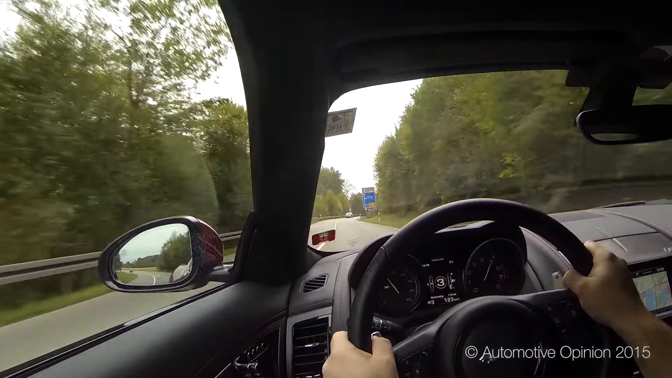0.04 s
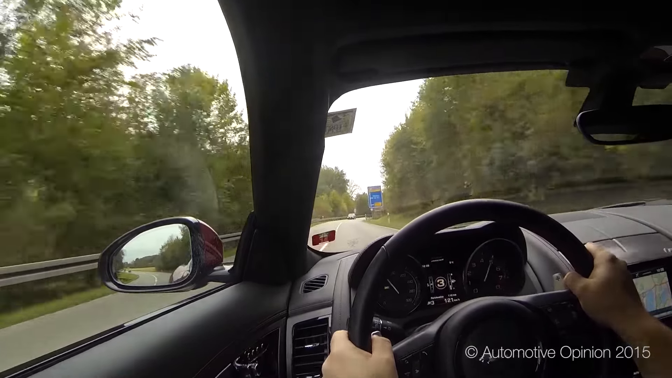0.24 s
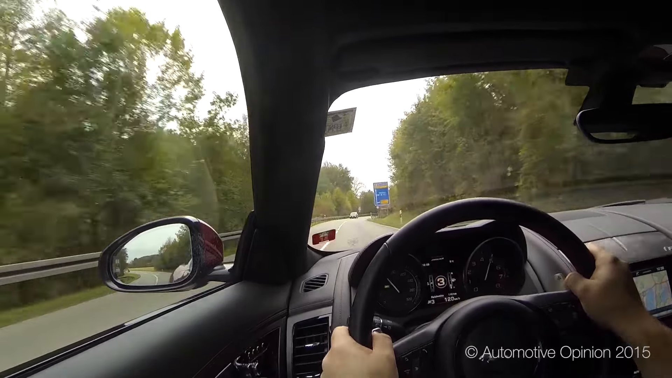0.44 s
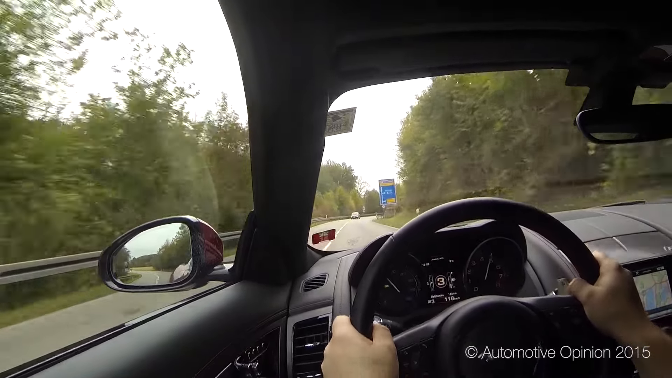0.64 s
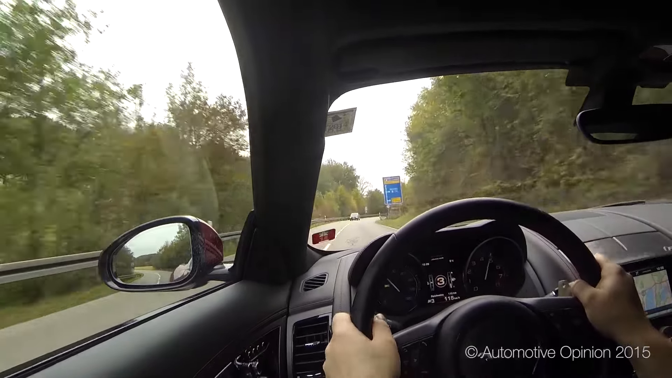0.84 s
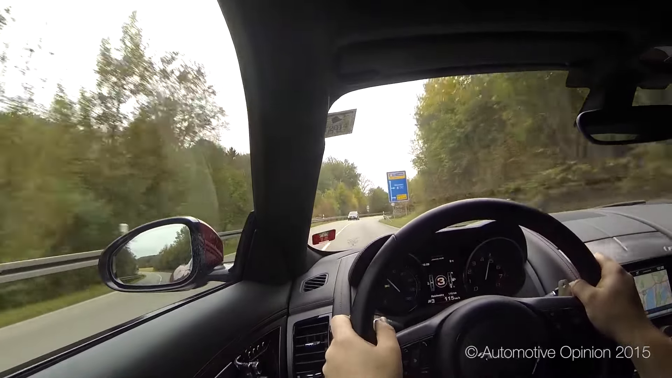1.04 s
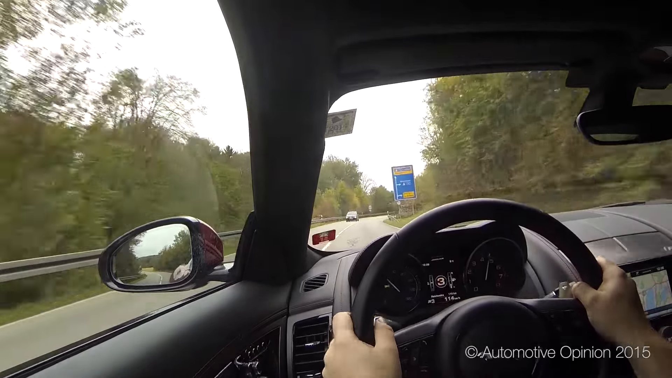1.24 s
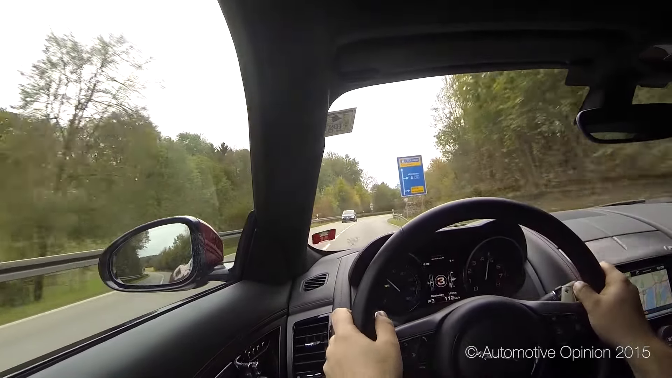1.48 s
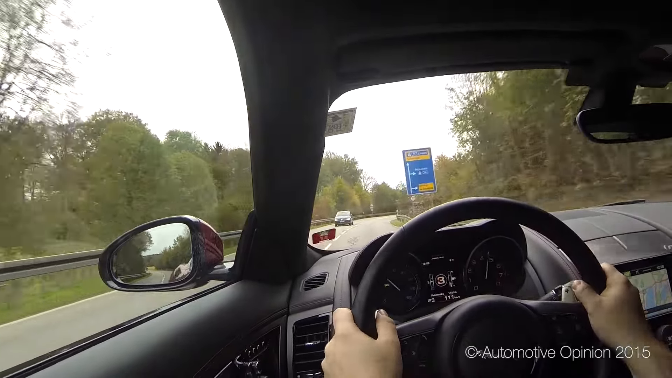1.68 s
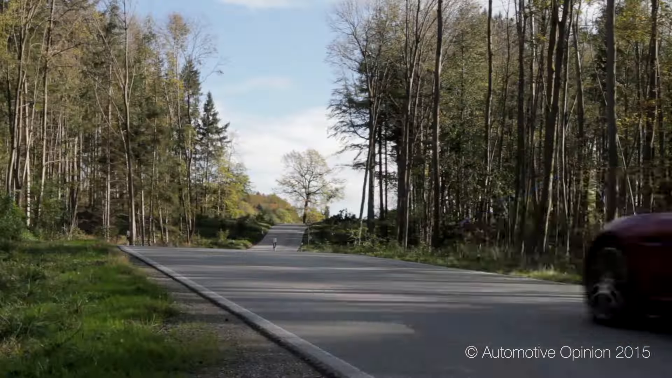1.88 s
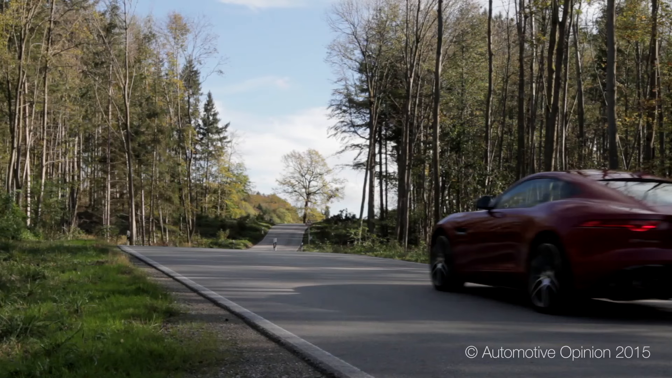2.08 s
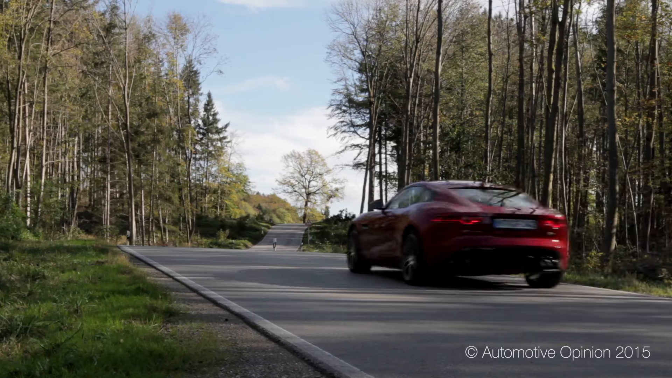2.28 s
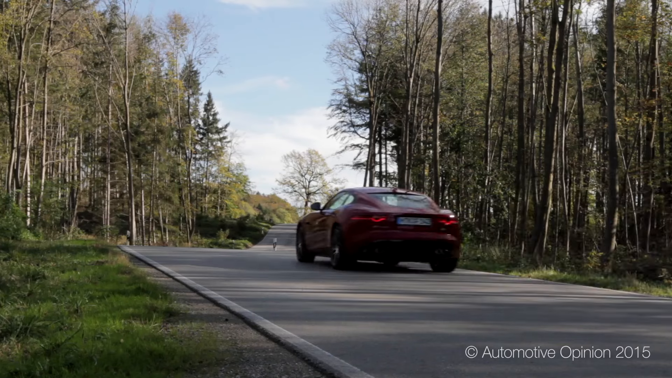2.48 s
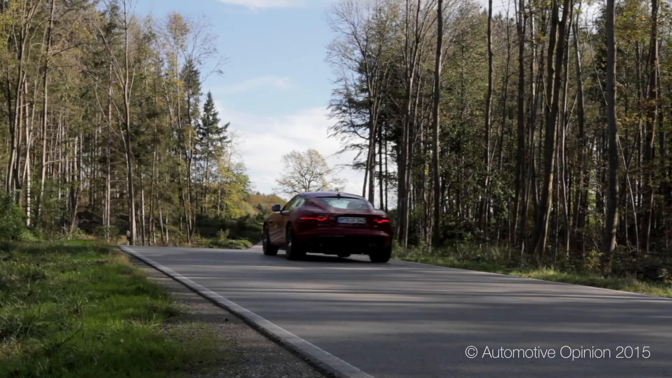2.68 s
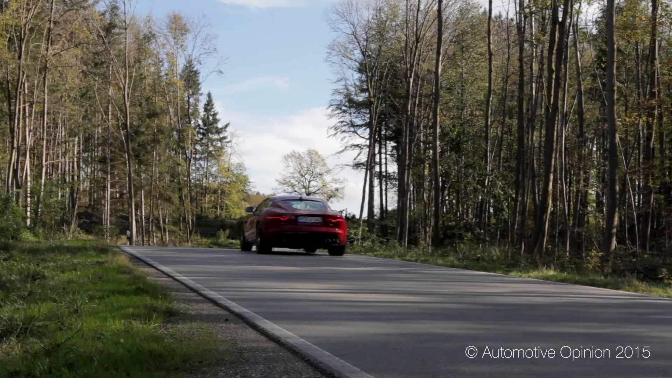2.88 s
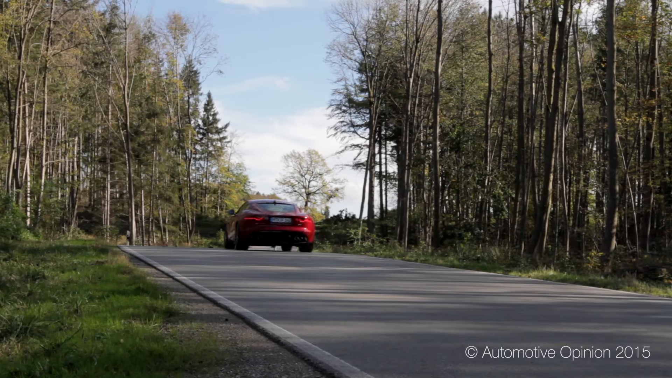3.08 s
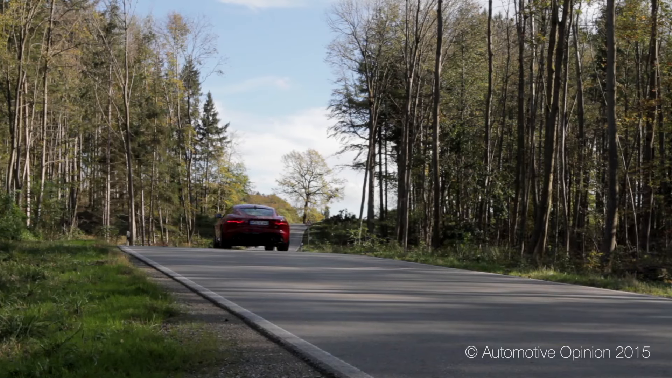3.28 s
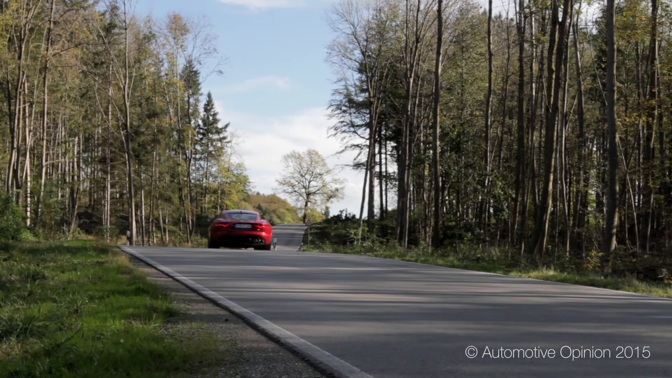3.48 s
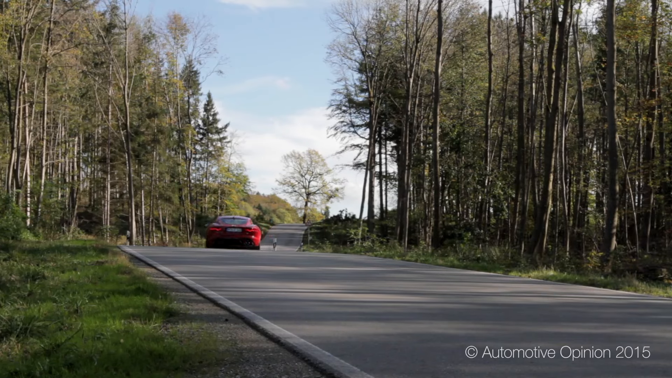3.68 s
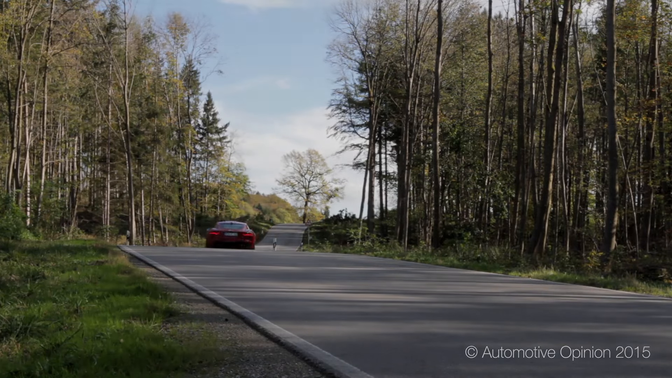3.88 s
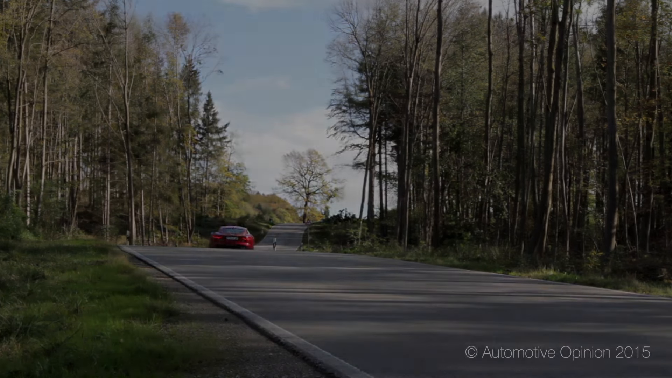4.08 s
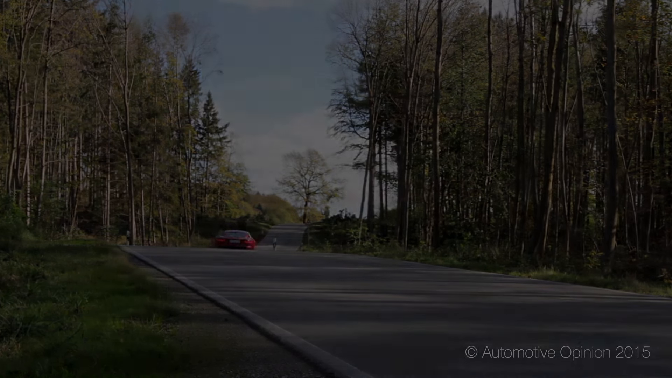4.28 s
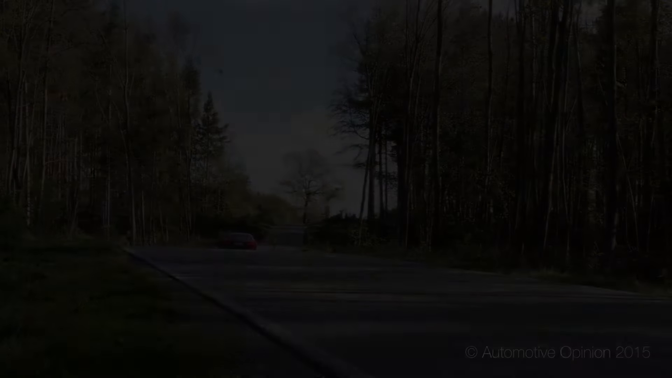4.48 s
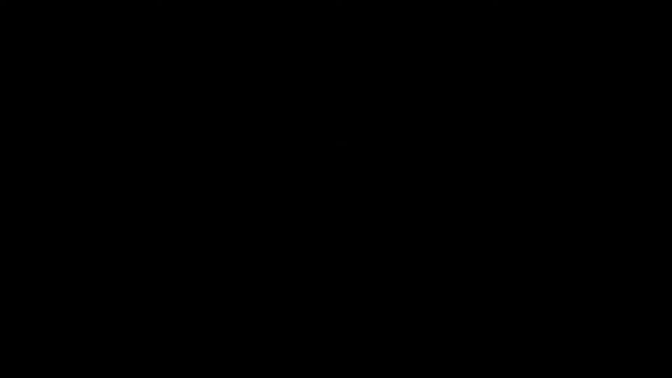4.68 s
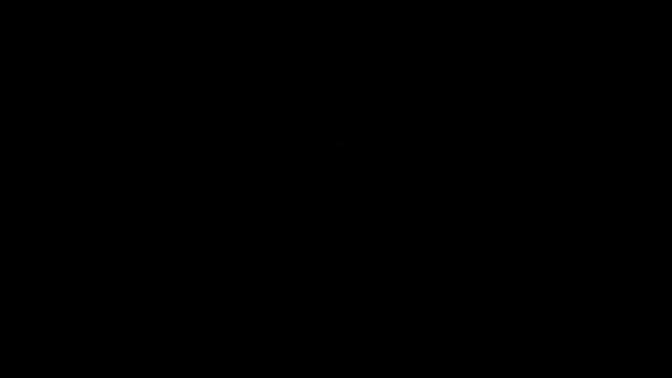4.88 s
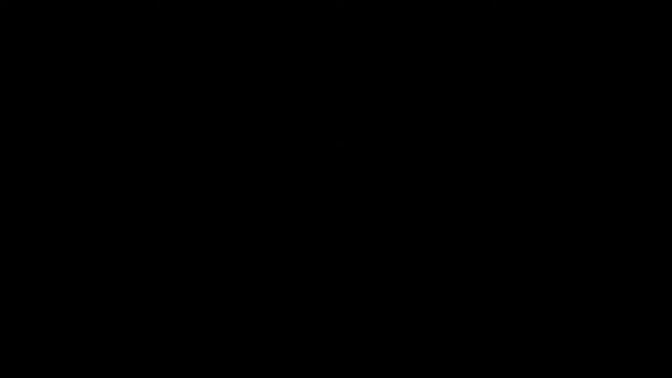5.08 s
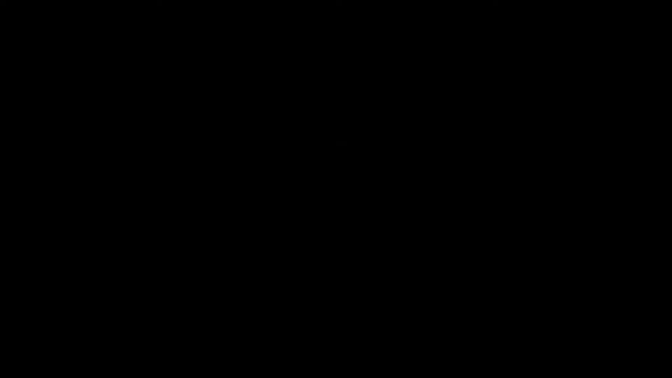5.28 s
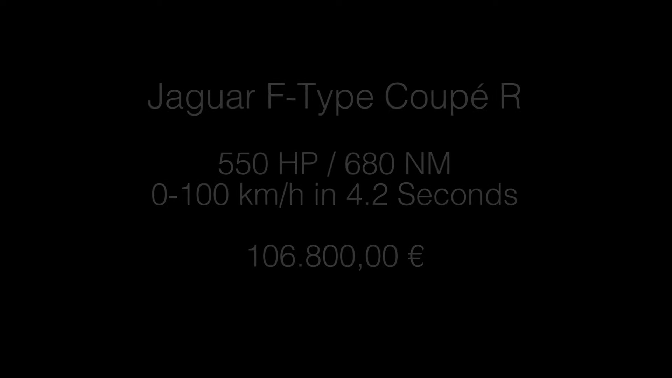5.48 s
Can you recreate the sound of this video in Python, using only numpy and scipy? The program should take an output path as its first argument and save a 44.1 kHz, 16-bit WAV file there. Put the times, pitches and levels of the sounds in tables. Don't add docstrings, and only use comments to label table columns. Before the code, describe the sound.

Booming car cabin with muffled exhaust burbles, then roadside tailpipe cracks and a V8 pulling away, shifting up and fading into trees.

```python
import sys
import numpy as np
from scipy import signal
from scipy.fft import rfft, irfft
from scipy.io import wavfile
from scipy.ndimage import uniform_filter1d

SR = 44100
rng = np.random.default_rng(int(sys.argv[2]) if len(sys.argv) > 2 else 0)


def gain_from_db(level_db):
    decades = np.asarray(level_db, float) / 20
    return 10 ** decades


def wav_record(signal):
    frames = np.transpose(np.atleast_2d(signal))
    bounded = np.clip(frames, -1, 1)
    quanta = np.round(bounded * 32767).astype(np.int16)
    wavfile.write(sys.argv[1], SR, quanta)


N = 244314
T = np.arange(N) / SR

# freq_hz, level_db (per Hz)
ROAR = [(55, -6), (75, 4.5), (105, 0), (160, -3), (230, -8), (300, -8.5), (380, -11.5), (500, -14),
        (600, -30), (900, -25.5), (1300, -51)]
# freq_hz, level_db (per Hz)
WIND = [(410, 8), (700, 4), (894, 1.5), (1180, -5.5), (1280, -5.5), (1880, -1.5), (2570, -17.5),
        (3210, -16.5), (4640, -36.5), (10000, -63), (13000, -82.5), (22000, -120)]
# freq_hz, width_hz, level_db
PANEL_HUM = [(166.6, 17, -36), (218.6, 3.4, -25.5), (302.3, 4.6, -32), (406.3, 6.8, -38.5),
             (472.7, 2.7, -34.5)]
# start_s (centre), level_db
BUMPS = [(.04, -38), (.3, -17.5), (.435, -6.5), (.52, -11), (.6, -4.5), (.78, -11), (.97, -20),
         (1.071, -16.5), (1.15, -5), (1.25, -13), (1.35, -11), (1.489, -10), (1.59, -20.5), (1.66, -14.5),
         (1.8, -12), (1.89, -7.5), (1.97, -13.5), (2.06, -18.5), (2.18, -22.5), (2.28, -16), (2.38, -14)]
# start_s, thud_peak_db, rattle_peak_db
BURBLES = [(.414, -18.5, -28.5), (.5277, -22, -51), (0.582, -21, -54), (0.624, -25.5, -33),
           (0.66, -18, -32.5), (0.7486, -17.5, -27), (.8005, -6.5, -24), (.8631, -11, -32.5),
           (.9197, -10, -28.5), (.9817, -10.5, -42), (1.1093, -4.5, -25), (1.1943, -28, -33.5),
           (1.2773, -16.5, -52), (1.326, -12.5, -30), (1.403, -27, -57), (1.4272, -8.5, -28.5),
           (1.5316, -11, -27), (1.5773, -32, -44), (1.6189, -6.5, -23.5), (1.7262, -15.5, -28.5),
           (1.8392, -17, -33)]
# freq_hz, width_hz, level_db
FLOOR_PAN = [(410, 24, 0), (472, 28, -1), (570, 25, -13), (710, 40, -10), (826, 22, -7)]
# freq_hz, width_hz, level_db
RATTLE = [(1805, 130, 10), (2010, 370, 10), (3050, 500, -27.5)]
# freq_hz, level_db (per Hz)
TRIM_BUZZ = [(5000, -27), (7800, -10), (8600, 5), (9400, -11), (11000, -31.5)]
# freq_hz, level_db (per Hz)
ROAD_COLOUR = [(30, -27), (70, -21), (150, -14), (250, -5.5), (590, -12), (1000, -7), (1200, -6.5),
               (1600, -13), (2300, -19), (3000, -17.5), (4100, -37.5), (8000, -57), (12000, -57.5),
               (16500, -67.5)]
# start_s (centre), level_db
FAR_SWELLS = [
    (5.09, -34.5),
    (5.225, -33),
    (5.4, -44),
    (5.485, -40),
]
# start_s, cycle_rate_hz, exhaust_db, brightness_db
PULL = [(2.98, 30.5, -29.5, -15), (3.02, 30.69, -38, -15), (3.1, 32.09, -24.5, -4.5),
        (3.17, 33.34, -19.5, 2), (3.29, 34.8, -12, -3.5), (3.39, 34.65, -18.5, 1.7),
        (3.81, 37.32, -18.5, -1), (3.94, 38.47, -20, -2), (4.325, 40.1, -22, -3), (4.46, 35.92, -19, -1.5),
        (4.62, 30.08, -22.5, 1.5), (4.71, 28.63, -23.5, 2.5), (4.84, 29.4, -23, 2.5),
        (4.94, 29.34, -25.5, 3.5), (5.05, 28.83, -32, -5.5), (5.14, 28.8, -37.5, -5.5),
        (5.3, 29, -45, -0.5)]
# multiple (of the cycle rate), level_db
CYCLE = [(1, -58.5), (2, -21.5), (3, -24.5), (4, -9.5), (5, -21), (6, -11.5), (7, -16.5), (8, 1.5),
         (9, -13), (10, 1), (11, -8.5), (12, -3.5), (13, -18), (14, -9.5), (15, -12.5), (16, -8.5),
         (17, -16.5), (18, -8.5), (19, -19.5), (20, -8.5), (21, -11.5), (22, -23.5), (23, -16), (24, -14.5),
         (25, -24), (26, -23), (27, -25), (28, -20)]
FIRING_DB = [0, -2, -6, -6, -1, -2, 0, -4]
PUFF_DB = [0, -1, -6, -8, -4, -5, -7, -8]
# freq_hz, width_hz, level_db
EXHAUST = [(290.5, 330, -32), (383.3, 39.5, 6.5), (489, 168, 3), (750, 180, 2.5), (810, 62, -28.5)]
# freq_hz, width_hz, level_db
THUMP = [(90, 110, -2)]
# freq_hz, width_hz, level_db
TIPS = [(1296, 120, 3), (1778, 680, 10), (2793, 620, 3.5)]
# start_s, crack_peak_db, pipes_db, sizzle_db (under the crack)
CRACKS = [(1.927, -16, -0.5, -28), (1.9343, -20, -9, -15.5), (1.945, -1, -1, -20), (2.0228, -1, -3.5, -19),
          (2.0445, -6.5, 0, -23.5), (2.0576, -0.5, -6.5, -8.5), (2.064, -17.5, -12, -8.5),
          (2.126, -3.5, -8, -38), (2.182, -2, -2.5, -13), (2.2372, -17.5, -9, -30.5), (2.2652, -4, -7, -21),
          (2.3023, -18.5, -27, -9.5), (2.3152, -0.5, -5.5, -7), (2.3534, -11.5, -2.5, -24),
          (2.4214, -9, -3, -9.5), (2.439, -1, -5.5, -15), (2.4615, -1.5, -11.5, -2),
          (2.5254, -1, -5.5, -10.5), (2.5544, -13, -13.5, -16.5), (2.5633, -16.5, -21, -30),
          (2.581, -9.5, -7, -22), (2.6323, -9, -6.5, -38), (2.6653, -4, -7.5, -34.5),
          (2.6762, -1.5, -2.5, -27.5), (2.6823, -12, -16, -32), (2.7019, -5.5, -12.5, -37),
          (2.7744, -1, -11, -19), (2.809, -14, -16.5, -37), (2.8627, -10.5, -10.5, -45.5)]
# start_s, crack_peak_db, pipes_db
PUTTS = [(1.9736, -27, -17), (2.1026, -17, -11), (2.1441, -33.5, -3), (2.1751, -28.5, -2.5),
         (2.567, -26, -10.5), (2.588, -37, -7.5), (2.603, -41.5, -12.5), (2.7631, -40, -15),
         (2.7986, -28.5, -4.5), (2.9341, -41, -7.5), (2.94, -26, -16), (2.957, -36, -16.5),
         (3.149, -27.5, -16)]
# freq_hz, level_db (per Hz)
CRACK_COLOUR = [(700, -14.5), (1100, 1), (1700, 2), (2100, 1), (2600, -4.5), (3170, 5.5), (4200, -8.5),
                (5500, -12.5), (8000, -38.5)]
# freq_hz, width_hz, level_db
LONG_PIPE = [(105, 60, -15), (190, 60, -13), (280, 40, -10), (377, 30, 0), (450, 40, -10)]
# freq_hz, width_hz, level_db
SHORT_PIPE = [(680, 50, 0), (760, 60, -4), (1080, 200, -11)]
# freq_hz, width_hz, level_db
SHOCK = [(1700, 630, -1.5), (3070, 460, -16), (4570, 1000, -1.5)]
# freq_hz, width_hz, level_db
AFTER_RING = [(382.2, 60, 0)]

BOOM_HZ, BOOM_WIDTH_HZ, BUMP_S = 36.1, 18, 0.03
BOOM_DB, ROAR_DB, WIND_DB = -19, -17, -29.5
CABIN_END_S, CABIN_FADE_S, CABIN_CEILING = 2.53, 0.09, 1.1
BURBLE_T60_S, RATTLE_T60_S = 0.12, 0.19
BEAT_HZ, BEAT_SAG_HZ_PER_S, BEAT_AT_S = 69.2, 1.2, .803
BEAT_DB, BEAT_BURBLE_DB, BEAT_T60_S = -25, -3, .4
VERGE_S, PASS_S, PASS_BEFORE_S, PASS_AFTER_S, PASS_DB, FOREST_DB = 1.9, 2.4, 0.2, 0.54, -35, -34
TREES_T60_S, TREES_DB = 0.64, -19
DRONE_S, DRONE_END_S, DRONE_DB, DRONE_DB_PER_S = 1.92, 3.02, -24.5, -14
SWELL_S, FAR_S, FAR_DB = 0.037, 5.0, -46
REFERENCE_HZ, ODD_LAG, HIGH_MULTIPLES_DB, HIGH_TOP_HZ = 38.3, .125, -23, 1050
MISFIRE_SHARE, BITE_S, BITE_FOR_S, BITE_SHARE = .15, 3.28, .07, .4
SHIFT_S, SHIFT_FOR_S, SHIFT_SHARE, COAST_S, COAST_SHARE_PER_S = 4.445, .085, .45, 5.1, 1.5
GAS_DB, RASP_DB, RASP_ROUGH_DB, OPEN_S, OPEN_FOR_S, SHUT_DB = -7.5, -26, 9.5, 3.148, 0.0067, -8.5
TAIL_S, TAIL_S_PER_DB, PIPE_TAIL, KNOCK_PER_DB = 0.093, 0.0432, 0.86, 0.43
AFTER_RING_DB, PUTT_SIZZLE_DB, SHORT_PER_CRACK_DB = -8, -24.5, -0.16
FACING_S, FACING_FOR_S, LONG_DIP_DB, SHORT_AWAY_DB = 2.404, 0.29, -7.5, -7.5
GROUND_ECHO_S, GROUND_SHARE = 0.001092, 0.11
OVERLOAD, OFFSET = .66, -.0074


def level(x, db=0):
    return x * gain_from_db(db) / np.sqrt(np.mean(x ** 2))


def columns(table):
    s, *rest = np.transpose(table)
    gate = np.clip(np.minimum(T - s[0], s[-1] + 0.012 - T) / .02, 0, 1)
    return [np.interp(T, s, c) for c in rest], gate


def bell(at, width, order=2):
    return np.exp(-((T - at) / width) ** order)


def between(start, end, fade=0.054):
    return np.clip(np.minimum((T - start) / 0.0071, (end - T) / fade), 0, 1)


def ease_off(end, span):
    return np.clip((end - T) / span, 0, 1)


def resonance(f, modes):
    return sum(gain_from_db(db) * 1j * f * w / (hz ** 2 - f ** 2 + 1j * f * w) for hz, w, db in modes)


def response(modes=(), points=None):
    f = np.fft.rfftfreq(N, 1 / SR) + 1e-3
    if points is None:
        return resonance(f, modes)
    hz, db = np.transpose(points)
    return gain_from_db(np.interp(np.log(f), np.log(hz), db, left=-90, right=-90))


def ring(x, **shape):
    return irfft(rfft(x) * response(**shape), N)


def unit_ring(x, modes):
    return ring(x, modes=modes) / np.max(np.abs(irfft(response(modes), N)))


def dull(x, hz, order=4):
    return signal.sosfilt(signal.butter(order, hz, fs=SR, output="sos"), x)


def noise(**shape):
    return level(ring(rng.standard_normal(N), **shape))


def walk(rate):
    k = int(SR / rate)
    held = np.repeat(rng.standard_normal(N // k + 1), k)
    return 2.18 * uniform_filter1d(uniform_filter1d(held, k), k)[:N]


def clicks(s, size):
    at, out = np.asarray(s) * SR, np.zeros(N + 2)
    i = at.astype(int)
    np.add.at(out, i, size * (1 - at + i))
    np.add.at(out, i + 1, size * (at - i))
    return out[:N]


def tails(s, size, t60):
    out = np.zeros(N)
    for t, g, d in zip(s, size, t60):
        i = int(t * SR)
        d = max(d, .005)
        n = min(N - i, int(d * SR))
        out[i:i + n] += g * np.exp(-np.log(1000) * T[:n] / d)
    return out


def road_and_forest():
    swell = gain_from_db(PASS_DB) * np.where(T < PASS_S, bell(PASS_S, PASS_BEFORE_S), bell(PASS_S, PASS_AFTER_S))
    strength = between(VERGE_S, 9) * (gain_from_db(FOREST_DB) + swell)
    return strength * gain_from_db(.8 * walk(12)) * noise(points=ROAD_COLOUR)


def trees(x):
    n = int(TREES_T60_S * SR)
    tail = rng.standard_normal(n) * np.exp(-np.log(1000) * T[:n] / TREES_T60_S) * (T[:n] > .008)
    tail = signal.lfilter([1], [1, -.7], tail)
    return gain_from_db(TREES_DB) * signal.fftconvolve(x, tail / np.sqrt(np.sum(tail ** 2)))[:N]


def body_boom():
    boom = rng.standard_normal(N)
    for _ in range(2):
        boom = ring(boom, modes=[(BOOM_HZ, BOOM_WIDTH_HZ, 0)])
    boom = boom / (np.abs(signal.hilbert(boom)) + 0.1 * boom.std()) ** .7
    shake = gain_from_db(BOOM_DB) + sum(gain_from_db(db) * bell(s, BUMP_S) for s, db in BUMPS)
    return level(boom) * shake


def panel_hum():
    hum = 0
    for hz, width, db in PANEL_HUM:
        band = ring(noise(modes=[(hz, width, 0)]), modes=[(hz, 2 * width, 0)])
        hum = hum + gain_from_db(db) * level(band)
    return hum


def cabin():
    roar = gain_from_db(ROAR_DB + 2.34 * walk(17.0)) * noise(points=ROAR)
    wind = gain_from_db(WIND_DB + 0.4 * walk(10.6)) * noise(points=WIND)
    air = body_boom() + roar + ease_off(2.5, 0.95) * (panel_hum() + wind)
    return between(0, CABIN_END_S, CABIN_FADE_S) * air


def overrun():
    turns = np.cumsum(BEAT_HZ - BEAT_SAG_HZ_PER_S * T) / SR
    s = np.interp(np.arange(1, 140) + turns[int(BEAT_AT_S * SR)] % 1, turns, T)
    chance = rng.standard_normal((len(s), 2)).T
    at, thud_db, _ = np.transpose(BURBLES)
    after = tails(at + .004, gain_from_db(thud_db), BEAT_T60_S + 0 * at)
    push = np.minimum(gain_from_db(BEAT_DB) + gain_from_db(BEAT_BURBLE_DB) * after, gain_from_db(-15)) * ease_off(2.05, 0.5)
    beats = clicks(s + 5e-4 * chance[0], -gain_from_db(3.0 * chance[1])) * push
    return dull(unit_ring(beats, [(417, 37, -6), (803, 68, -7)]), 1100)


def burbles():
    s, thud_db, rattle_db = np.transpose(BURBLES)
    idle_flow = gain_from_db(-28) * ease_off(2.5, 0.95) * between(0, CABIN_END_S, CABIN_FADE_S)
    flow = idle_flow + tails(s, gain_from_db(thud_db), BURBLE_T60_S + 0 * s)
    puff = clicks(s, gain_from_db(thud_db)) + gain_from_db(-27) * flow * rng.standard_normal(N)
    through_floor = unit_ring(unit_ring(puff, FLOOR_PAN), [(417, 130, 0.017), (710, 49, 0.0061)])
    thud = gain_from_db(2.5) * through_floor / 20
    shaking = dull(tails(s, gain_from_db(rattle_db), RATTLE_T60_S + 0 * s), 310, order=2)
    trim = dull(noise(modes=RATTLE), 3200) + gain_from_db(-41.5) * noise(points=TRIM_BUZZ)
    return thud + gain_from_db(-1.5) * shaking * trim


def drone():
    hum = level(ring(noise(modes=[(387.6, 36, 0)]), modes=[(354, 68, 0)]))
    hum = level(hum / (np.abs(signal.hilbert(hum)) + .3) ** .6)
    near = between(DRONE_S, DRONE_END_S) * gain_from_db(DRONE_DB + DRONE_DB_PER_S * (T - DRONE_S))
    swells = sum(gain_from_db(db) * bell(s, SWELL_S) for s, db in FAR_SWELLS)
    far = between(FAR_S, 9) * gain_from_db(FAR_DB) + swells
    return (near + far) * hum


def steady_note(hz, bright_db, cycle, on):
    steady = np.zeros(N)
    for m, m_db in CYCLE + [(m, HIGH_MULTIPLES_DB) for m in range(29, 37)]:
        f = m * hz[on]
        pipe = resonance(f, EXHAUST) / abs(resonance(m * REFERENCE_HZ, EXHAUST))
        if m > 28:
            pipe = pipe * np.clip((HIGH_TOP_HZ - f) / 100, 0, 1)
        gain = gain_from_db(m_db + bright_db[on] * np.clip((f - 400) / 250, 0, 1))
        lag = ODD_LAG * (round(m) % 2) * (m < 29)
        steady[on] -= gain * np.real(pipe * np.exp(2j * np.pi * m * (cycle[on] - lag)))
    return steady


def gas_and_rasp(kick, on):
    puffs = dull(signal.lfilter([1], [1, -np.exp(-1 / (.002 * SR))], kick), 1500, order=1)
    puffs = puffs / np.sqrt(np.mean(puffs[on] ** 2))
    hiss = (.25 + puffs) * ring(noise(modes=TIPS), modes=TIPS)
    knock = ring(kick, modes=TIPS)
    band = signal.butter(3, [1050, 4000], "band", fs=SR, output="sos")
    gas = signal.sosfilt(band, hiss / hiss[on].std() + .6 * knock / knock[on].std())
    rasp_colour = [(3500, -25.0), (4200, 6.5), (6800, -4.5), (7500, -12), (10000, -17.5), (16000, -36)]
    rasp = (0.31 + puffs ** 0.94) * noise(points=rasp_colour)
    return gas / gas[on].std(), rasp / rasp[on].std()


def engine():
    (hz, db, bright_db), gate = columns(PULL)
    on = gate > 0
    surge = BITE_SHARE * bell(BITE_S, BITE_FOR_S) + SHIFT_SHARE * bell(SHIFT_S, SHIFT_FOR_S, order=6)
    coasting = COAST_SHARE_PER_S * np.maximum(T - COAST_S, 0)
    rough = np.clip(MISFIRE_SHARE + surge + coasting, 0, .9)
    shut = SHUT_DB / (1 + np.exp((T - OPEN_S) / OPEN_FOR_S))
    gas_db = GAS_DB + shut
    rasp_db = RASP_DB + shut + RASP_ROUGH_DB * .8 * surge
    cycle = np.cumsum(hz * gate) / SR
    steady = steady_note(hz, bright_db, cycle, on)
    k = np.arange(1, int(8 * cycle[-1]))
    s = np.interp(k, 8 * cycle, T)
    chance = rng.standard_normal((len(k), 2)).T
    misfires = clicks(s, gain_from_db(np.array(FIRING_DB)[k % 8]) * np.tanh(3 * chance[0]))
    uneven = dull(ring(misfires, modes=EXHAUST + THUMP), 1100)
    kick = clicks(s + 6e-5 * chance[0], gain_from_db(np.array(PUFF_DB)[k % 8] + 3.5 * np.tanh(chance[1])))
    gas, rasp = gas_and_rasp(kick, on)
    note = np.sqrt(1 - rough ** 2) * steady / steady[on].std() + rough * uneven / uneven[on].std()
    return -gate * gain_from_db(db) * (note + gain_from_db(gas_db) * gas + gain_from_db(rasp_db) * rasp)


def pipe_thud(s, db, long_db, short_db, t60):
    thud = 0
    softer_db = KNOCK_PER_DB * np.minimum(db - np.array(CRACKS_AND_PUTTS_PIPES_DB()), 0)
    for pipe_db, pipe, top_hz in ((long_db, LONG_PIPE, 800), (short_db, SHORT_PIPE, 1800)):
        knock = 0.96 * clicks(s, gain_from_db(pipe_db + softer_db))
        rush = gain_from_db(-20.5) * tails(s, gain_from_db(pipe_db), PIPE_TAIL * t60) * rng.standard_normal(N)
        thud = thud + gain_from_db(7.5) * dull(unit_ring(knock + rush, pipe), top_hz, order=2)
    twice = response(AFTER_RING) ** 2
    after = irfft(rfft(clicks(s, gain_from_db(long_db))) * twice, N) / np.max(irfft(twice, N))
    return thud + gain_from_db(AFTER_RING_DB) * after


def CRACKS_AND_PUTTS_PIPES_DB():
    return [row[2] for row in CRACKS + PUTTS]


def cracks():
    putts = [(*putt, PUTT_SIZZLE_DB) for putt in PUTTS]
    s, db, pipes_db, under_db = np.transpose(CRACKS + putts)
    is_crack = np.arange(len(s)) < len(CRACKS)
    facing = np.exp(-((s - FACING_S) / FACING_FOR_S) ** 2) * is_crack
    long_db = pipes_db + LONG_DIP_DB * facing
    short_db = pipes_db + SHORT_AWAY_DB * (1 - facing) + SHORT_PER_CRACK_DB * db
    t60 = TAIL_S + TAIL_S_PER_DB * db
    thud = pipe_thud(s, db, long_db, short_db, t60)
    shock = gain_from_db(-12.0) * dull(unit_ring(clicks(s, gain_from_db(db)), SHOCK), 4000)
    spray = tails(s, gain_from_db(db), 0.26 * t60) + gain_from_db(-4.0) * tails(s, gain_from_db(db), t60)
    direct = thud + shock + gain_from_db(-4.5) * dull(spray, 3700, order=1) * noise(points=CRACK_COLOUR)
    sizzle_size = gain_from_db(db + under_db)
    sizzle = tails(s, sizzle_size, 0.21 * t60) + gain_from_db(-9.5) * tails(s, sizzle_size, 0.97 * t60)
    hiss = gain_from_db(-5.5) * sizzle * noise(points=[(4000, -24.0), (6500, 12), (11000, 3), (16000, -13.0)])
    return direct + GROUND_SHARE * np.roll(direct, int(GROUND_ECHO_S * SR)) + hiss


def roadside():
    car = cracks() + engine() + drone()
    return np.clip(car + trees(car) + road_and_forest(), -OVERLOAD, OVERLOAD)


def scene():
    inside = cabin() + burbles() + overrun()
    return (CABIN_CEILING * np.tanh(inside / CABIN_CEILING) + roadside())[None]


def roll_off(x):
    return signal.sosfilt(signal.butter(12, 17150, fs=SR, output="sos"), x)


def record(dry):
    cut = signal.sosfilt(signal.butter(1, 12, "high", fs=SR, output="sos"), dry)
    mix = np.clip(cut + OFFSET, -1, 1)
    return roll_off(mix)


dry = scene()
out = record(dry)
wav_record(out)
```